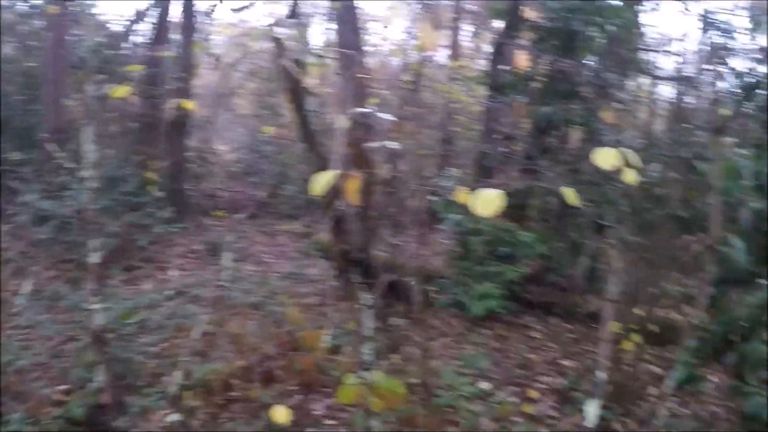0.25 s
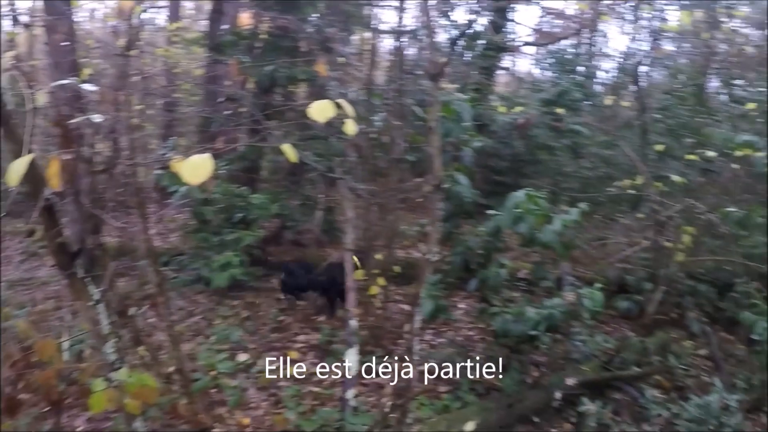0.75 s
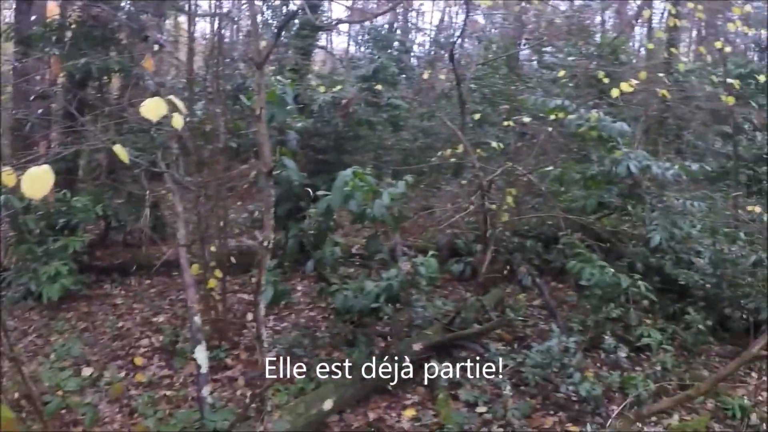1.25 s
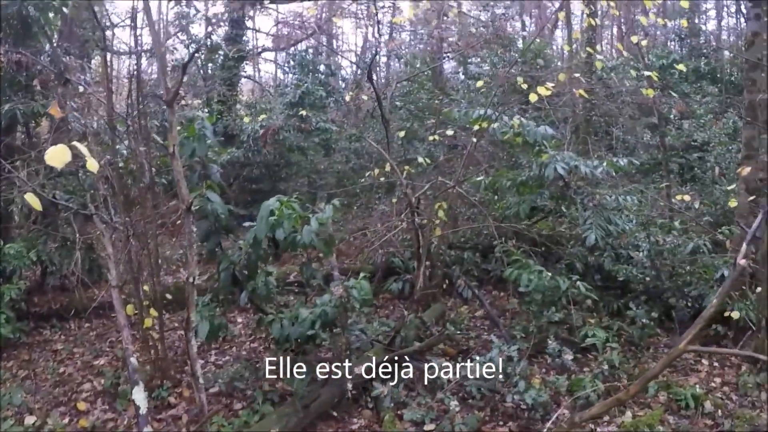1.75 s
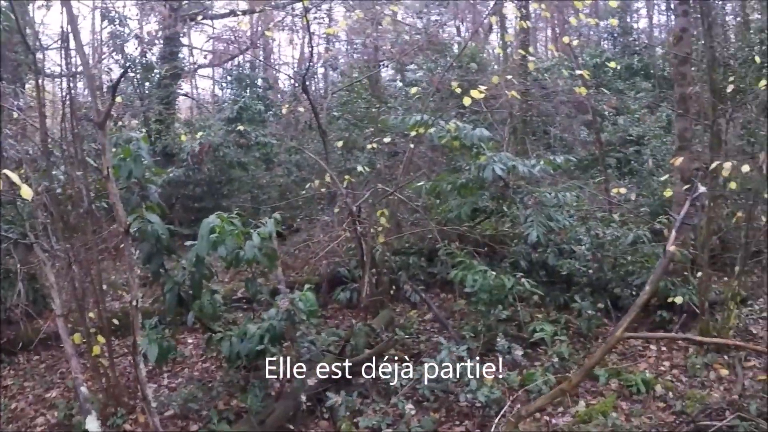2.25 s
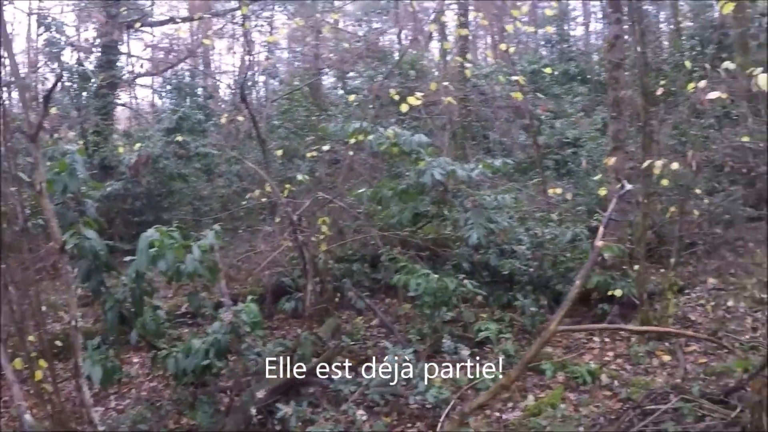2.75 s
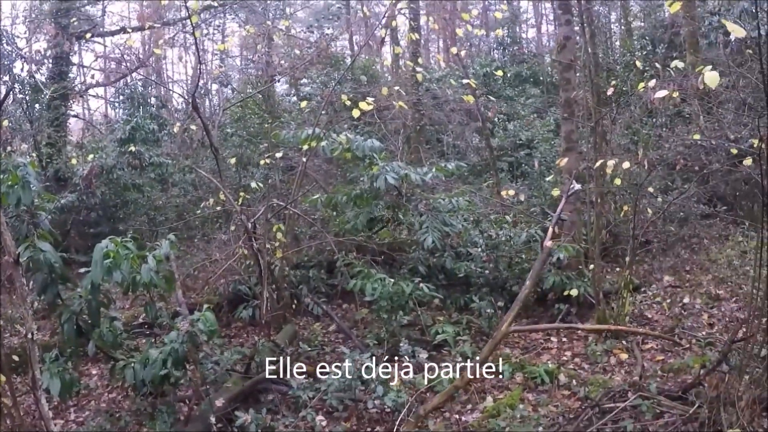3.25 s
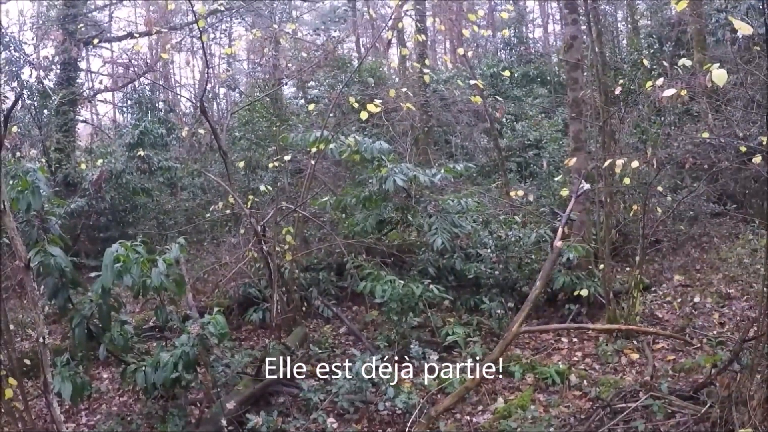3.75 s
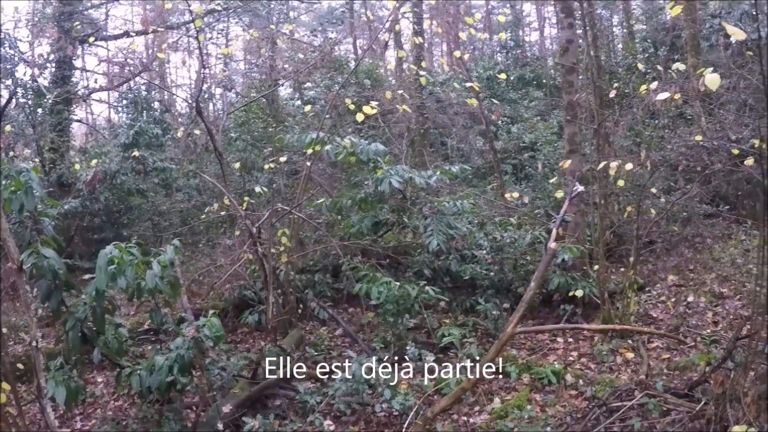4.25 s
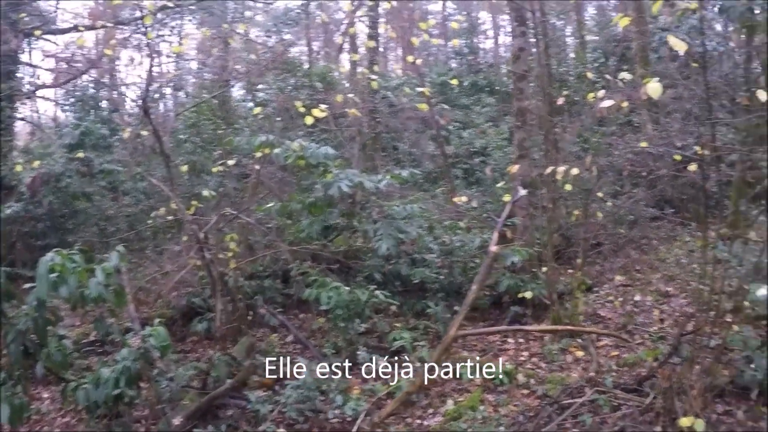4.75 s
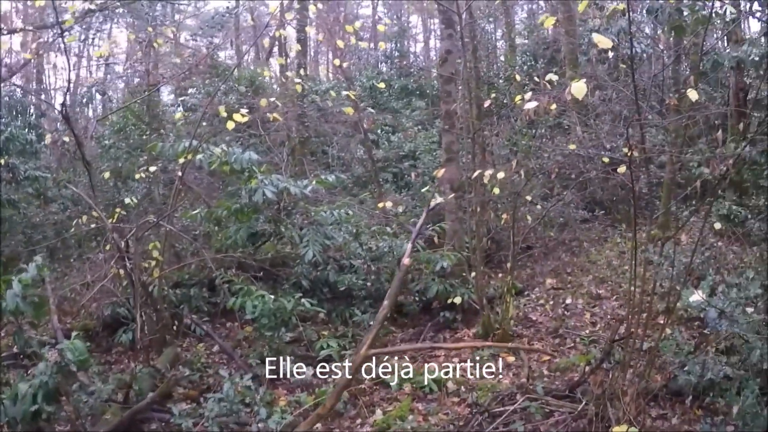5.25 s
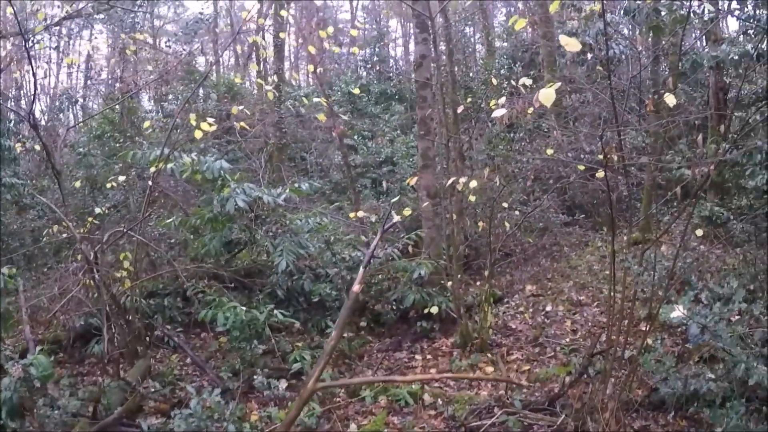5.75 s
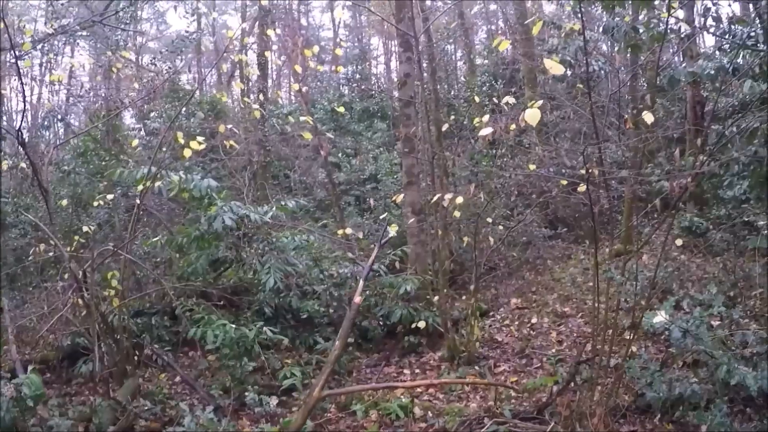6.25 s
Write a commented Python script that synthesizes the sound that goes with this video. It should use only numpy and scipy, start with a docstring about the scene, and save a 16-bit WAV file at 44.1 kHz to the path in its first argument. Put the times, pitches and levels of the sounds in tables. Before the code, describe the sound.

In autumn woods, a dog moves away through brush: its collar bell clinks in dense, irregular clusters with short, high metallic rings, over crisp leaf rustle, sharp little twig cracks and dull footfalls. After about two seconds the strokes spread out and soften, with occasional louder jingles midway. Faint steady outdoor noise lies beneath, trees scatter the ring slightly, and the sound stops with a very quick fade. The bell is central, its top treble slightly wide.

```python
"""Woodland brush: a small bell on a dog's collar jangles as the dog runs off.
Each clapper blow starts dying rings in the same modes; motion bends their pitch, fur damps them
and trunks scatter them. Filtered noise makes the rustling leaves, snapping twigs and soft thuds.
A distant low wash of noise and a rumble of air on the microphone lie beneath; the sound fades out."""
import sys
import numpy as np
from scipy import signal
from scipy.fft import rfft, irfft, next_fast_len
from scipy.io import wavfile
from scipy.ndimage import uniform_filter1d

SR = 44100
rng = np.random.default_rng(int(sys.argv[2]) if len(sys.argv) > 2 else 0)


def generate_wav(sig):
    """Save sig (samples, or channels by samples) to the path in sys.argv[1] as 16-bit PCM at SR."""
    pcm = np.round(np.clip(np.atleast_2d(sig).T, -1, 1) * 32767).astype(np.int16)
    wavfile.write(sys.argv[1], SR, pcm)


N = 286196

# Clapper blows; levels are those of a mode family, before each mode's own offset:
# (time [s], low ring level [dB], centre of low ring [Hz], low ring t60 [s], middle ring level [dB],
#  lean of the middle ring to the lower of its two tones [dB], bright ring level [dB])
CLAPPER_BLOWS = [(0.0024, -22, 1473, 0.22, -32, -9, -24), (0.0205, -17, 1474, 0.22, -30.5, -2, -24.5),
                 (0.1216, -41, 1450, 0.23, -46, 10, -50), (0.1376, -34, 1410, 0.23, -47, 4, -31),
                 (0.1523, -36, 1480, 0.25, -37, -17, -19), (0.1688, -15, 1461, 0.33, -16, -5, -22),
                 (0.2303, -21.5, 1405, 0.35, -42, 12, -27), (0.3135, -17, 1430, 0.19, -26.5, -4, -32.5),
                 (0.377, -29, 1455, 0.26, -32, -10, -33), (0.413, -17.5, 1460, 0.24, -21, -16, -35),
                 (0.427, -14, 1480, 0.17, -20, 1, -27), (0.439, -24.5, 1460, 0.15, -32, -3.5, -23),
                 (0.464, -22, 1466, 0.14, -34, -12, -23.5), (0.5478, -13.5, 1450, 0.26, -20, 11, -25),
                 (0.5631, -19, 1450, 0.14, -19.5, 9, -23), (0.628, -16.5, 1434, 0.35, -26, -2, -19),
                 (0.823, -22, 1455, 0.21, -36, -11, -30.5), (0.91, -12, 1407, 0.21, -31, -2, -17),
                 (0.9714, -22, 1408, 0.22, -24.5, 4, -19.5), (1.007, -20, 1466, 0.25, -26.5, -17, -26),
                 (1.058, -20, 1485, 0.26, -27, -9, -22.5), (1.1538, -21.5, 1430, 0.35, -31, 6, -24),
                 (1.1959, -17.5, 1444, 0.19, -36, 7, -29), (1.254, -29, 1416, 0.25, -30, 2, -37),
                 (1.271, -19.5, 1463, 0.23, -34, 13, -27.5), (1.3962, -21, 1436, 0.18, -41, -3, -36),
                 (1.45, -35, 1390, 0.23, -39.5, -2, -31), (1.507, -32.5, 1477, 0.25, -46, 0, -36),
                 (1.5596, -29, 1460, 0.29, -42, -5, -27), (1.6316, -28.5, 1413, 0.16, -39.5, -6, -23.5),
                 (1.654, -28.5, 1456, 0.14, -45, -2, -32), (1.718, -26, 1437, 0.2, -41, -6, -44),
                 (1.74, -26, 1452, 0.14, -50, -5, -44), (1.841, -15, 1440, 0.19, -27, 16, -32),
                 (1.8916, -49, 1431, 0.25, -26, 20, -55), (1.9722, -21.5, 1473, 0.22, -31, -9, -29),
                 (2.05, -34, 1486, 0.2, -45, 7, -40), (2.0793, -31, 1422, 0.3, -49, -7, -40.5),
                 (2.2011, -18, 1425, 0.16, -29, -7, -29), (2.3083, -24, 1447, 0.24, -32, 10, -32),
                 (2.3294, -30, 1435, 0.16, -36, -3, -25), (2.41, -30, 1446, 0.21, -40.5, 0, -33),
                 (2.5279, -13.5, 1448, 0.28, -26, -12, -22.5), (2.6417, -32.5, 1450, 0.16, -39, -6, -41),
                 (2.727, -24, 1426, 0.23, -36.5, -11, -30.5), (2.7501, -26, 1436, 0.16, -37, 0, -29),
                 (2.9034, -22, 1436, 0.21, -37, -8, -42), (3.0427, -30, 1436, 0.3, -40, -10, -35),
                 (3.1132, -30.5, 1467, 0.29, -38, -3.5, -31), (3.2326, -41, 1415, 0.21, -51, 4, -37),
                 (3.281, -36, 1430, 0.31, -47.5, 1, -39.5), (3.355, -28.5, 1426, 0.23, -33, 20, -37.5),
                 (3.424, -23.5, 1452, 0.37, -32.5, 6, -30.5), (3.6357, -23.5, 1438, 0.18, -36.5, 3, -40.5),
                 (3.696, -36.5, 1402, 0.33, -42.5, 1, -57), (3.8841, -22, 1484, 0.27, -32.5, -19, -42),
                 (3.9965, -24, 1424, 0.19, -44, -11, -35), (4.0127, -23, 1460, 0.2, -33.5, 1, -28),
                 (4.0873, -27.5, 1447, 0.22, -35, 4, -35), (4.1352, -27, 1461, 0.24, -36, -4, -37.5),
                 (4.276, -27, 1407, 0.18, -36, 4, -33.5), (4.319, -27, 1422, 0.32, -40, 1, -38.5),
                 (4.4607, -15.5, 1436, 0.21, -25.5, 11, -43), (4.502, -20, 1437, 0.21, -51, 10, -39.5),
                 (4.5268, -31, 1490, 0.21, -46, -3, -44), (4.796, -23, 1447, 0.22, -36, -15, -37),
                 (4.838, -24.5, 1381, 0.27, -39, -2, -36), (4.9222, -25.5, 1432, 0.23, -40, 4, -37),
                 (4.9504, -34.5, 1433, 0.38, -45, -8, -35.5), (5.0268, -41, 1394, 0.23, -48, 4, -42),
                 (5.067, -36.5, 1458, 0.15, -56, -3, -52), (5.235, -30, 1436, 0.2, -44, 6, -35),
                 (5.277, -38, 1430, 0.23, -38, 16, -43), (5.3423, -40, 1410, 0.15, -37, 26, -53),
                 (5.5376, -32, 1448, 0.55, -46, -6, -39.5), (5.6182, -30.5, 1465, 0.45, -34, -14, -31),
                 (5.6475, -22.5, 1450, 0.23, -34, -9, -32), (5.707, -23, 1453, 0.46, -37.5, -9, -33.5),
                 (5.893, -38, 1460, 0.19, -51, 11, -43), (5.9608, -37.5, 1446, 0.28, -59, 1, -50),
                 (6.051, -38.5, 1445, 0.16, -57, -5, -44)]
# Modes of the bell at rest:
# (family [0 low .. 5 top], frequency [Hz], level offset [dB], t60 [multiple of the low ring's])
BELL_MODES = [(0, 1398, -1, 1.72), (0, 1445, 2, 0.82), (0, 1470, 0.5, 0.19), (1, 3534, 2, 1.39),
              (2, 3726, 0, 1.74), (2, 3766, -1.5, 0.34), (2, 3817, 1, 0.28), (3, 5460, -2.5, 0.5),
              (3, 5537, -2.5, 0.51), (4, 6300, -0.5, 0.94), (4, 6523, -10.5, 0.85), (4, 6628, -4, 1.78),
              (4, 6568, -6, 0.76), (4, 6925, -3, 0.25), (4, 6870, -1, 0.74), (4, 7050, 0.5, 0.25),
              (5, 10190, 0.5, 0.67), (5, 10480, -10, 0.16), (5, 10300, -11, .45), (5, 12290, -5, 0.38),
              (5, 13800, -18, 0.28), (5, 14120, -9, 0.44), (5, 14500, -18, .3)]
# Doppler course of the family 1 mode, higher while the bell approaches: (time [s], frequency [Hz])
HEARD_PITCH = [(0, 3596), (.3, 3595), (.45, 3588), (.85, 3550), (1.2, 3553), (2.25, 3531), (2.45, 3536),
               (3.0, 3543), (3.55, 3546), (4.8, 3529), (5.35, 3561), (5.75, 3550), (6.1, 3536)]
# The bell presses into the fur and its ring drops: (time [s], loss [dB])
FUR_MUTES = [(.1, 14), (.39, 7), (.525, 15), (.69, 6.5), (1.1, 8), (1.311, 20), (2.55, 5.5), (2.93, 15),
             (4.56, 18), (5.09, 8), (5.757, 3)]
# Twig snaps and knocks, before rise and decay: (time [s], level [dB], centre [Hz])
TWIG_SNAPS = [(0.6733, -23, 3777), (0.8446, -26.5, 3770), (0.8724, -21, 4220), (0.915, -22, 3620),
              (1.212, -27, 3700), (1.2647, -19.5, 3660), (1.3194, -29, 3530), (1.4196, -35, 3970),
              (3.031, -25, 3760), (3.7124, -38, 3770), (4.7927, -38, 3683), (5.506, -35, 1984),
              (5.883, -27, 3490), (6.0247, -36, 3700), (6.187, -43, 2296), (6.264, -31, 3960)]
# Dull thuds in the leaf litter, before rise and decay: (time [s], level [dB], centre [Hz])
LITTER_THUDS = [(0.439, -36, 223), (0.509, -28, 226), (0.699, -34, 390), (0.85, -30.5, 300),
                (1.208, -32.5, 781), (1.746, -33, 735), (2.98, -33, 312.9), (5.5, -32.5, 565.7)]
# Rustle of leaves: (time [s], level of the duller part [dB], treble above that [dB])
RUSTLE_LEVELS = [(0, -44, -1), (.12, -48.5, 4), (.38, -59, 12), (.43, -40, 0), (.6, -50, 3), (.68, -46, -5),
                 (.87, -45, 0), (1.01, -45.5, 5.5), (1.25, -44.5, 0.5), (1.79, -50, -2), (1.97, -46, 2),
                 (2.08, -53.5, 1), (2.28, -47.5, -1), (2.53, -51, 4.5), (2.8, -53, 2), (2.89, -44.5, -4.5),
                 (3.14, -52.5, 2), (3.74, -53.5, -8), (3.98, -49, 3), (4.68, -53.5, -3), (5.02, -53.5, 2.5),
                 (6.22, -52.5, -1.5), (6.44, -58, -3)]
# Spectral shape of the leaves: (frequency [Hz], relative density [dB per Hz])
LEAF_SPECTRUM = [(200, -16), (600, 16.5), (1200, 12.5), (2500, 9), (4500, 2.5), (8500, -12.5), (12000, -27),
                 (15500, -19.5)]
# Spectral shape of the distant wash: (frequency [Hz], relative density [dB per Hz])
WASH_SPECTRUM = [(60, -54), (100, -19.5), (120, -25.5), (140, -0.5), (171, 2.5), (400, -5), (1220, -16.5),
                 (1450, -15), (1880, -19), (3170, -25), (3780, -18), (4910, -26), (10300, -24.5),
                 (14300, -40), (15600, -54)]
# Level of the wash: (time [s], level [dB])
WASH_LEVELS = [(0.0, -41.5), (0.7, -39.5), (5.08, -41), (5.33, -40), (6.26, -41), (6.42, -40.5)]
# Air on the microphone: (time [s], level [dB])
RUMBLE_LEVELS = [(0.0, -63), (0.46, -54), (0.61, -62), (1.64, -64), (1.7, -68), (6.42, -67)]
# Closing fade: (time [s], gain [dB])
CLOSING_FADE = [(6.435, 0), (6.445, -18), (6.465, -40), (6.49, -75)]

STEP = 16  # samples between envelope points
# The fourth family (3) follows the bright ring, the top (5) the mean of middle and bright:
# levels [dB] where that ring is at HARD_DB, and slopes [dB per dB]
HARD_DB = -32
FOURTH_DB, TOP_DB, FOURTH_SLOPE, TOP_SLOPE = -45.5, -45, 1, 1
# The struck spot moves both centres: bright centre [Hz] at a low centre [Hz], and slope [Hz per Hz]
BRIGHT_HZ, LOW_HZ, BRIGHT_PER_LOW = 6648, 1445, 0.9
RISE_SHARE = 0.013  # time constant of a mode's swell, as a share of its t60
LEAD_S = 0.004  # contact comes just before the blow is heard
SNAP_T60, SNAP_RISE_S, THUD_T60, THUD_RISE_S = 0.013, 0.00042, 0.13, 0.0048  # s
EDGE_HZ = 15200  # upper band limit


def bell(low_spread_hz=34, bright_spread_hz=230, swing=0.00186, chatter_db=-12, chatter_rate=90,
         echo_db=-7, echo_t60=0.24, echo_shift=0.008, contact_db=4.0, uneven_db=4.0,
         tremble=1.1e-5, detune=0.00409):
    """Every blow starts a dying envelope in each mode; the carriers share one Doppler shift."""
    t, rate = np.arange(N) / SR, SR / STEP
    slow = t[::STEP]
    count = len(slow)
    # the bell swings
    shift = follow(HEARD_PITCH, slow) / BELL_MODES[3][1] * (1 + swing * drifting(count, 143.8))
    turns = np.interp(t, slow, np.cumsum(shift) / rate)  # carrier cycles per Hz of mode frequency

    muted_db = sum(db / (1 + np.exp(np.clip((s - slow) / 0.0031, -30, 30))) for s, db in FUR_MUTES)
    starts = np.maximum(np.round((np.array(CLAPPER_BLOWS)[:, 0] - LEAD_S) * rate), 0).astype(int)
    # each blow also stills what rang before
    muted_db += contact_db * np.searchsorted(starts, np.arange(count), "right")

    size = (len(CLAPPER_BLOWS), len(BELL_MODES))
    luck_db = uneven_db * rng.standard_normal(size)
    detunings = detune * rng.standard_normal(size[0])  # each blow's ring is detuned slightly, at random
    phases = np.exp(2j * np.pi * rng.random(size))
    touches = rng.random(count) < chatter_rate / rate
    # trunks ahead of the running dog send the ring back a little higher
    ahead = np.cumsum(echo_shift * (1 + 0.55 * drifting(count, 211.1))) / rate

    out, u = np.zeros(N), slow[:int(rate / 2)]  # each ring lasts at most half a second
    for k, (family, hz, db, lasting) in enumerate(BELL_MODES):
        envelope = np.zeros(count, complex)
        for blow, phase, at, luck, detuning in zip(CLAPPER_BLOWS, phases, starts, luck_db, detunings):
            s, low_db, low_hz, t60, *upper = blow
            level_db = db + [low_db, *families(*upper)][family] + luck[k] * (family > 2)
            onset = phase[k]
            if family == 0:  # the spot that is struck favours the modes near one centre
                level_db -= 6 * ((hz * shift[at] - low_hz) / low_spread_hz) ** 2
                # neighbours start opposed, so the ring swells before it beats
                onset = phase[0] * (-1) ** k * np.exp(-2j * np.pi * hz * turns[at * STEP])
            if family in (1, 2):  # these ring on steadily: a new blow mostly adds to the ring
                onset = onset ** 0.59
            if family == 4:
                bright_hz = BRIGHT_HZ + BRIGHT_PER_LOW * (low_hz - LOW_HZ)
                level_db -= 6 * ((hz * shift[at] - bright_hz) / bright_spread_hz) ** 2
            age = u[:count - at]
            ring_t60 = t60 * lasting
            fall_db = 60 * age / ring_t60 + muted_db[at:at + len(u)] - muted_db[at]
            swell = 1 - np.exp(-age / (RISE_SHARE * ring_t60))
            detuned = onset * np.exp(2j * np.pi * hz * detuning * age)
            envelope[at:at + len(u)] += detuned * gain_of(level_db - fall_db) * swell

        # the clapper keeps touching while the bell rings, feeding each mode small kicks
        recent = uniform_filter1d(abs(envelope), 100, origin=45)
        kicks = touches * np.exp(2j * np.pi * rng.random(count)) * recent
        keep = gain_of(-60 / (0.17 * lasting * rate))
        envelope += gain_of(chatter_db) * signal.lfilter([1], [1, -keep], kicks)
        # shaking blurs the higher modes
        envelope *= np.exp(2j * np.pi * hz * tremble * (family > 2) * drifting(count, 9.7))

        scatter = gain_of(-60 * u / echo_t60) * np.exp(2j * np.pi * rng.random(len(u)))
        scatter *= u > 0.008  # the first echoes come after 8 ms
        returned = envelope * np.exp(2j * np.pi * hz * ahead)
        echo = signal.fftconvolve(returned, scatter / np.linalg.norm(scatter))[:count]
        envelope += gain_of(echo_db) * echo
        out += (np.interp(t, slow, envelope) * np.exp(2j * np.pi * hz * turns)).real
    return out


def families(middle_db, lean_db, bright_db):
    """Levels of the five upper families of modes in one blow; harder blows excite more of each."""
    lower_db = middle_db + min(lean_db, 0)
    upper_db = middle_db - max(lean_db, 0)
    fourth_db = FOURTH_DB + FOURTH_SLOPE * (bright_db - HARD_DB)
    top_db = TOP_DB + TOP_SLOPE * ((middle_db + bright_db) / 2 - HARD_DB)
    return [lower_db, upper_db, fourth_db, bright_db, top_db]


def ticks(click_db=-1, t60=0.019, splash_db=-4, splash_t60=0.21):
    """Bare contact of the clapper: a bright noise click and a diffuse splash of many faint modes."""
    out, u = np.zeros(N), np.arange(4000) / SR
    shape = gain_of(click_db - 60 * u / t60) + gain_of(splash_db - 60 * u / splash_t60)
    noises = rng.standard_normal((len(CLAPPER_BLOWS), 4000))
    for (s, *row), noise in zip(CLAPPER_BLOWS, noises):
        top_db = families(*row[-3:])[-1]
        add(out, max(s - LEAD_S, 0), gain_of(top_db) * shape * noise)
    return signal.sosfilt(signal.butter(1, 4000, "high", fs=SR, output="sos"), out)


def snaps():
    """Twigs crack as sharp resonant noise bursts; paws land as softer, lower ones."""
    twigs = bursts(TWIG_SNAPS, 1.6, SNAP_RISE_S, SNAP_T60)
    return twigs + bursts(LITTER_THUDS, 1.48, THUD_RISE_S, THUD_T60)


def bursts(table, width, rise, t60):
    """Short noise bursts, each through a broad resonance, with a quick rise and a decay."""
    out, u = np.zeros(N), np.arange(6000) / SR
    for (s, db, hz), noise in zip(table, rng.standard_normal((len(table), 6000))):
        b, a = signal.butter(2, [hz / width, min(hz * width, 15000)], "band", fs=SR)
        shape = gain_of(db - 60 * u / t60) * (1 - np.exp(-u / rise))
        add(out, s, shape * evened(signal.lfilter(b, a, noise)))
    return out


def trunks(x, t60=0.36):
    """Sparse, decaying echoes of random sign from the trees."""
    taps = np.zeros(SR // 2)
    at = np.arange(400, SR // 2 - 20, 20) + rng.integers(0, 20, (SR // 2 - 401) // 20)
    taps[at] = rng.choice([-1., 1.], len(at)) * gain_of(-60 * at / SR / t60)
    return signal.fftconvolve(x, taps / np.linalg.norm(taps))[:N]


def rustle(crackles_per_s=1500, spread_db=4.5, hiss=0.75):
    """Crackles of many sizes and a finer hiss of leaves, brighter or duller from moment to moment."""
    t = np.arange(N) / SR
    struck = rng.random(N) < crackles_per_s / SR
    sizes = gain_of(spread_db * np.minimum(rng.exponential(1, N), 5)) * struck
    decay = np.exp(-np.arange(400) / 60)
    grains = signal.oaconvolve(sizes, decay)[:N] * rng.standard_normal(N)
    leaves = coloured(evened(grains) + hiss * rng.standard_normal(N), LEAF_SPECTRUM)
    dull = signal.sosfiltfilt(signal.butter(2, 5500, fs=SR, output="sos"), leaves)
    treble = gain_of(follow(RUSTLE_LEVELS, t, column=2)) * evened(leaves - dull)
    return gain_of(follow(RUSTLE_LEVELS, t)) * (evened(dull) + treble)


def wash(patchy_db=1.5):
    """Distant steady noise with drifting spectral patches, and a lumpy low-band rumble under it."""
    frames = N // 256 + 5
    real, imaginary, patches = rng.standard_normal((frames, 513, 3)).T
    patches = evened(uniform_filter1d(uniform_filter1d(patches, 10, 0), 14, 1))  # over Hz, then time
    spectra = (real + 1j * imaginary) * gain_of(patchy_db * patches)
    noise = signal.istft(spectra, nperseg=1024, noverlap=768)[1][:N]
    t = np.arange(N) / SR
    band = signal.butter(2, [22, 62], "band", fs=SR, output="sos")
    low = signal.sosfilt(band, rng.standard_normal(N))
    distant = gain_of(follow(WASH_LEVELS, t)) * evened(coloured(noise, WASH_SPECTRUM))
    return distant + gain_of(follow(RUMBLE_LEVELS, t)) * evened(low)


def gain_of(db):
    """Amplitude factor of a level in dB."""
    return 10 ** (np.asarray(db) / 20)


def evened(x):
    """Scales to an rms of 1."""
    return x / np.sqrt(np.mean(abs(x) ** 2) + 1e-20)


def read(points, hz):
    """Reads a spectrum between its points, along log frequency."""
    f, value = np.transpose(points)
    return np.interp(np.log(hz + 1), np.log(f + 1), value)


def follow(rows, t, column=1):
    """Reads one column of a timed table along straight lines."""
    rows = np.array(rows)
    return np.interp(t, rows[:, 0], rows[:, column])


def add(mix, s, sound):
    """Adds a sound into the mix from time s on, cut at the end."""
    part = mix[round(s * SR):][:len(sound)]
    part += sound[:len(part)]


def coloured(x, points):
    """Filters by a (frequency [Hz], level [dB]) spectrum."""
    size = next_fast_len(N)
    gains = gain_of(read(points, np.fft.rfftfreq(size, 1 / SR)))
    return irfft(rfft(x, size) * gains, size)[:N]


def drifting(size, smooth):
    """Slow chance of rms 1: noise averaged twice over a number of points."""
    once = uniform_filter1d(rng.standard_normal(size), int(smooth))
    return evened(uniform_filter1d(once, int(smooth)))


def scene():
    """Bell in front, clicks and snaps with their tree echoes, then leaves and the distant wash."""
    clicks = snaps() + ticks()
    mix = bell() + clicks + gain_of(-6.5) * trunks(clicks) + rustle() + wash()
    return np.array([mix, mix])


def record(dry):
    """One centred image whose top treble differs between the ears; a fade; the band limit."""
    smear = rng.standard_normal(3000) * np.hanning(3000)
    top = signal.sosfilt(signal.butter(24, 11400, "high", fs=SR, output="sos"), dry.mean(0))
    side = gain_of(-5) * signal.oaconvolve(top, smear / np.linalg.norm(smear), "same")
    wide = (dry + np.array([side, -side])) * gain_of(follow(CLOSING_FADE, np.arange(N) / SR))
    band_limit = signal.firwin(511, EDGE_HZ, window=("kaiser", 9), fs=SR)
    return signal.oaconvolve(wide, band_limit[None], "same")


dry = scene()
out = record(dry)
generate_wav(out)
```